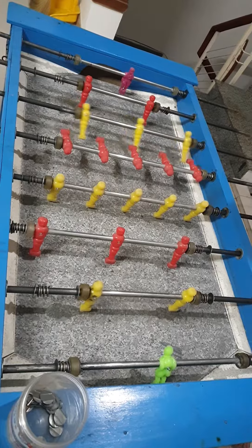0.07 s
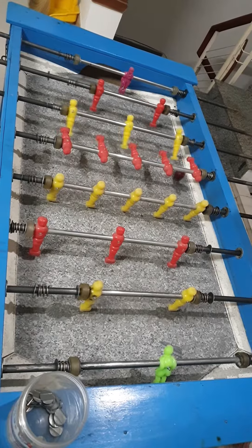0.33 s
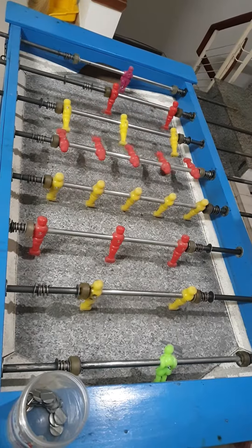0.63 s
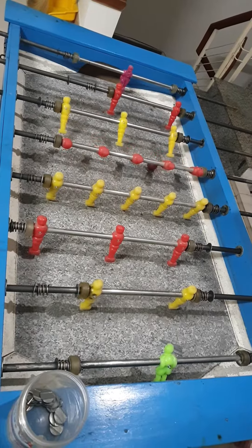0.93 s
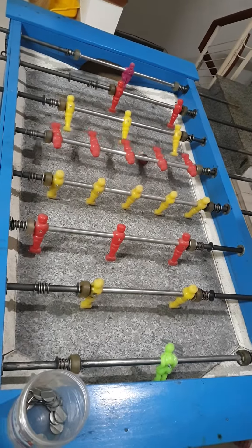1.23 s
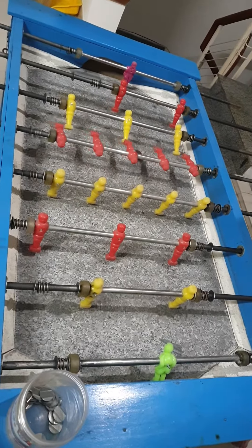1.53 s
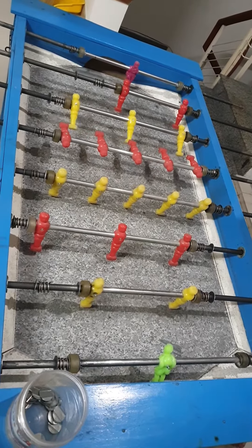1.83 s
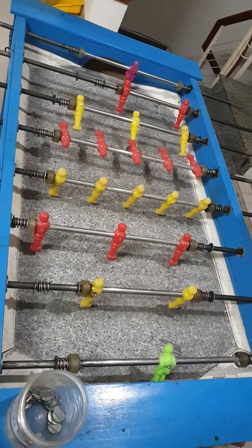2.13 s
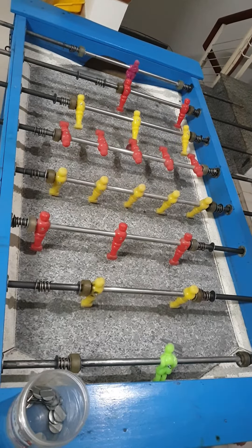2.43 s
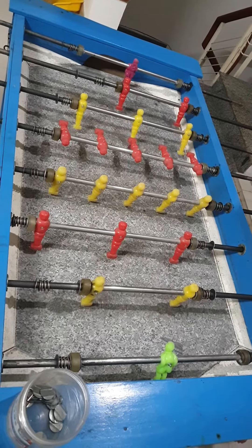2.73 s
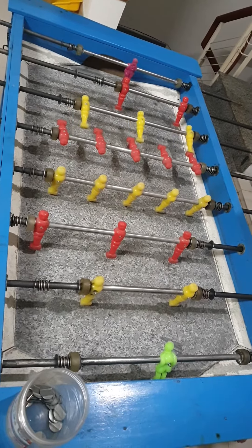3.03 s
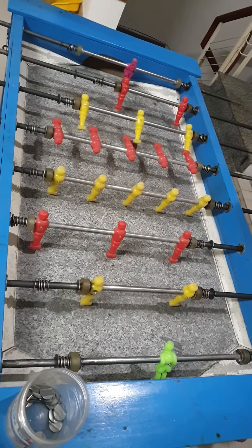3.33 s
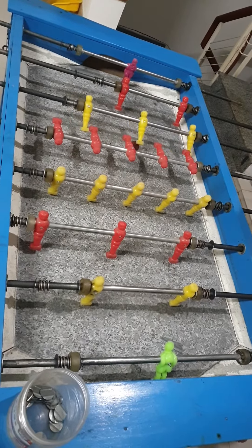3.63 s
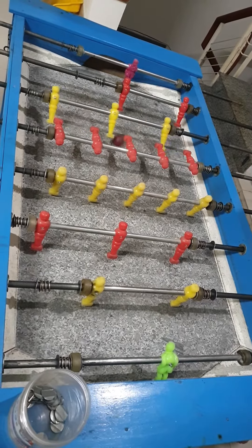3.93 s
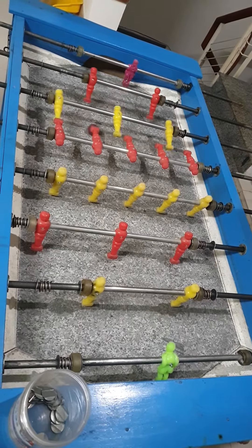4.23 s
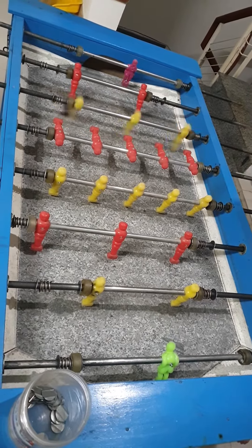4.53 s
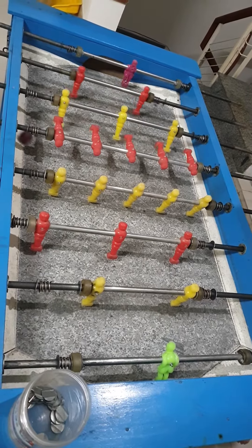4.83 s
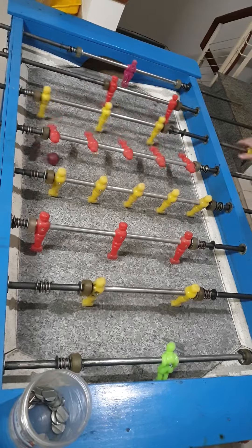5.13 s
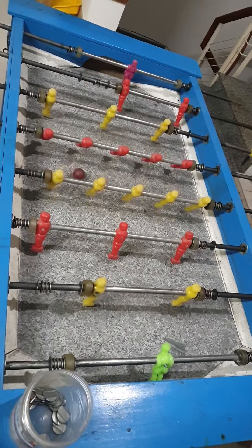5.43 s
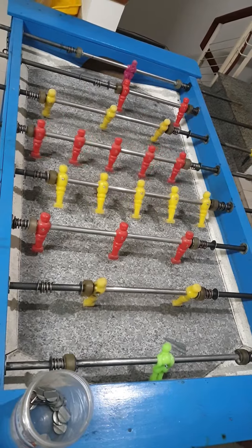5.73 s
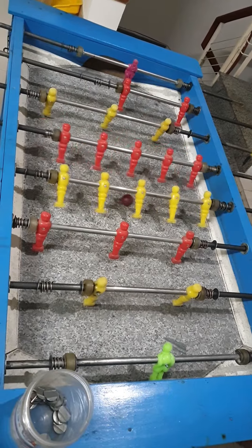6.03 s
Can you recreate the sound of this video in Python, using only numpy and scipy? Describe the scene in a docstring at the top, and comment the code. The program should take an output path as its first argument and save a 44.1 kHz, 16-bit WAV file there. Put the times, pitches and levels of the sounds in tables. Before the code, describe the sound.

Sharp clacks and metallic rattles burst from a table football game close by, then fall away to a few soft bumps. Halfway through, play picks up: the ball is knocked and rumbles over the playfield, and a hard volley of hits rings the wooden cabinet. Sliding steel rods and their springs clink and zing, ending with a muffled knock. The hits echo in a hall with a faint hum.

```python
"""Plastic men crack a ball against the wooden cabinet of a table football game in a hard, echoing hall.
Each blow makes the wood ring, and between blows the ball rolls over the playfield.
Steel rods scrape in their bushings (the sleeves that hold them), their washers clash and their
buffer springs ring. A faint hum lies underneath. It is all heard from one end of the table."""
import sys
import numpy as np
from scipy import signal
from scipy.fft import rfft, irfft, next_fast_len
from scipy.io import wavfile
from scipy.ndimage import map_coordinates

SR = 44100
rng = np.random.default_rng(int(sys.argv[2]) if len(sys.argv) > 2 else 0)


def master_out(mix):
    """Clip the mix to full scale and print it as 16-bit PCM to the path in sys.argv[1]."""
    frames = np.transpose(np.atleast_2d(mix))
    ceiling = np.clip(frames, -1, 1)
    pcm = np.round(ceiling * 32767).astype(np.int16)
    wavfile.write(sys.argv[1], SR, pcm)


N = 268569
T = np.arange(SR // 3) / SR  # time within one short sound [s]

# Blows of men, ball and rod ends on the cabinet. Treble above the hardness is dulled.
# (time [s], level [dB], hardness [Hz], bass thump [dB], main resonance [Hz])
BLOWS = [(-.07, -17, 5850, 7, 1220), (.1002, -7, 3610, 0, 993), (.129, -20.5, 5950, -5, 3000),
         (.247, -9.5, 5930, -2, 1300), (.2973, -14.5, 3570, -1.5, 1310), (1.232, -31.5, 854, 2, 460),
         (1.6335, -44.5, 797, 7, 683), (2.978, -45.5, 3500, 11.5, 1144), (3.4692, -25, 2040, -1.5, 1350),
         (3.6638, -25, 2000, -2, 715), (3.681, -28, 2240, -11, 1550), (3.747, -42.5, 1290, 15.5, 530),
         (3.8427, -27.5, 1760, -3.5, 1350), (4.258, -34, 1200, 3, 597), (4.6384, -14, 9500, -8.5, 3850),
         (4.6627, -7, 6250, -18, 2860), (4.6774, -13.5, 2290, -8, 1090), (4.8236, -12, 1810, -1.5, 568),
         (4.9604, -21, 2200, 1, 590), (4.983, -15, 2280, -8.5, 1110), (5.028, -20, 3120, -2.5, 1620),
         (5.9057, -14, 960, -16, 974), (5.917, -28, 900, 9, 650)]
# Ringing notes of cabinet, playfield and men. A fade time, or t60, is the time to drop by 60 dB.
# (pitch [Hz], level [dB], fade time [s])
BODY_NOTES = [(144.3, -14.5, 0.15), (179.5, -12.5, 0.16), (199.3, -16, 0.29), (296.8, -14, 0.12),
              (444.6, -17.5, 0.15), (559.6, -8.5, 0.05), (645, -14.5, 0.048), (790, -7, 0.042),
              (970, -12, 0.1), (1069, -11, 0.068), (1080, -19.5, 0.093), (1245, -10, 0.058),
              (1411.6, -4, 0.055), (1657, -8.5, 0.032), (1815, -8, 0.04), (1983, -3.5, 0.022),
              (2804, -27.5, 0.02), (3335, -13, 0.16), (3838, -5, 0.062), (4900, -21.5, 0.15)]
# Tone of a blow's crack and clatter: (frequency [Hz], level [dB])
CLACK_SPECTRUM = [(30, -28.5), (80, -19.5), (160, -10), (350, -4), (1150, 0), (2200, 1), (4200, -0.5),
                  (5600, -4), (7600, -6.5), (8800, -27.5), (16000, -27.5)]
# How long the cabinet clatters: (frequency [Hz], fade time [s])
CABINET_FADE = [(150, 0.16), (500, 0.42), (1500, 0.15), (5000, 0.085), (12000, 0.041)]
# Washers and springs clashing on the rods: (time [s], level [dB], treble tilt [dB per octave])
WASHER_CLASHES = [(-.03, -18.5, -2), (0.1023, -19, -1.5), (0.134, -18.5, 8), (.191, -26.5, .5),
                  (0.2474, -27.5, -11), (.638, -47, 7.5), (.856, -46.5, -7.5), (1.2, -47, -2),
                  (1.238, -44, 7.5), (2.964, -40, 0.5), (2.978, -30, 3), (3.6645, -11.5, 5),
                  (4.038, -38, 4.5), (4.246, -46, -0.5), (4.296, -43, 0), (4.62, -35, 0.5),
                  (4.6385, -13.5, 0), (4.6546, -20, -1.5), (5.069, -28.5, 1.5), (5.153, -32, -2),
                  (5.255, -37, 9), (5.299, -31, 2.5), (5.351, -37, -3), (5.781, -30.5, 19),
                  (5.832, -33.5, 1), (5.914, -39, 11)]
# Tone of the steel clashes and scrapes, including the microphone's dip near 9 kHz:
# (frequency [Hz], level [dB])
STEEL_SPECTRUM = [(30, -57), (300, -18), (1000, -0.5), (3000, -4), (5500, -2.5), (7800, 1), (8700, -10),
                  (10500, -4), (13000, -5), (15800, -6.5)]
# Spring coil notes that every clash rings: (pitch [Hz], level [dB], fade time [s])
COIL_NOTES = [(4940, -20, 0.12), (5480, -21.5, 0.1097), (7640, -21.5, .24), (11560, -25, .4),
              (12900, -24, 0.37)]
# Thin notes of jolted springs: (time [s], pitch [Hz], level [dB])
SPRING_ZINGS = [(0.093, 9400, -27), (2.968, 9370, -30.5), (4.037, 12500, -37), (4.135, 10300, -41),
                (4.209, 12500, -36), (4.293, 12900, -29), (4.707, 13080, -21), (5.141, 13230, -26.5),
                (5.288, 10300, -25), (5.302, 12700, -26), (5.347, 10150, -29), (5.505, 10800, -29.5),
                (5.777, 10940, -24.5), (5.835, 10850, -28.5)]
# Strokes of the sliding rods: (time [s], length [s], level [dB])
ROD_STROKES = [(-.05, 0.32, -42), (4.02, 0.27, -53), (5.06, 0.5, -48), (5.5, 0.24, -50),
               (5.76, 0.15, -40.5)]
# Runs of the ball after a kick: (time [s], length [s], level [dB])
BALL_RUNS = [(-.05, 0.033, -34), (1.23, 0.071, -50), (1.63, .08, -60.5), (2.24, 0.028, -62),
             (2.84, 0.92, -55), (3.7, 0.63, -41), (4.6, 0.15, -33.5), (5.42, 0.19, -44), (5.9, 0.23, -46.5)]
# Tone of the playfield drumming under the ball: (frequency [Hz], level [dB])
DRUM_SPECTRUM = [(30, -26), (50, -6), (75, -4), (100, -3.5), (138, 6), (190, -5), (250, -8.5), (400, -17),
                 (1000, -39), (4000, -91.5)]
# Tone of the ball's grinding: (frequency [Hz], level [dB])
GRIT_SPECTRUM = [(80, -25), (200, 3.5), (330, 1), (560, 5), (900, 0), (1400, -6.5), (2400, -16),
                 (5000, -35.5), (16000, -60.5)]
# Tone of the hall's still air: (frequency [Hz], level [dB])
AIR_SPECTRUM = [(15, -33.5), (25, -10.5), (53, -8), (120, -7), (149, -4.5), (354, -20.5), (607, -22),
                (659, -19), (714, -25), (1260, -38.5), (2350, -46), (2550, -25), (2840, -50), (4870, -43.5),
                (7800, -43), (9000, -55.5), (14000, -53.5)]
# Steady hum and whine: (pitch [Hz], level [dB])
HUM_TONES = [(48.4, -60), (667.5, -70.5), (2530, -77), (4797, -91.5)]
# How long the hall echoes: (frequency [Hz], fade time [s])
HALL_FADE = [(80, 1), (250, 1.41), (1000, 1.385), (2500, 1.23), (4200, 1.16), (7500, 0.89), (10000, 0.72),
             (15000, 0.6)]
# Left-right difference, relative to the sound both sides share: (frequency [Hz], level [dB])
STEREO_WIDTH = [(100, -63.5), (500, -62), (1000, -65.5), (2000, -48), (4500, -58), (6500, -48), (8300, -34),
                (9800, -7), (12000, -45.5)]


def knocks(echoes, ring_db=-2, clatter_db=-3, crack_db=2.5, crack_t60=0.026, sharpness=5.1,
           thump_hz=420, soft_hz=1620, detune=0.011):
    """Each blow cracks, rings the cabinet's main notes and sets its many lesser ones clattering."""
    out = np.zeros(N)
    hz, note_db, t60 = np.transpose(BODY_NOTES)[:, :, None]
    decay = amp(note_db - 60 * T / t60)
    for s, db, hard_hz, thump_db, main_hz in with_rebounds(BLOWS):
        # the spot that is hit sets the sign, strength and exact pitch of each note
        sign, strength_db, pitch = rng.standard_normal((3, len(BODY_NOTES), 1))
        waves = np.sin(2 * np.pi * hz * (1 + detune * pitch) * T)
        ring = (np.sign(sign) * amp(strength_db) * decay * waves).sum(0)
        clatter = fading(noise(CLACK_SPECTRUM, len(T)), CABINET_FADE)
        crack = noise(CLACK_SPECTRUM, len(T)) * amp(-60 * T / crack_t60)
        blow = amp(ring_db) * ring + amp(clatter_db) * clatter + amp(crack_db) * crack
        # a soft contact loses treble, a heavy one gains bass
        soft = lambda f: 1 / ((1 + 1j * f / hard_hz) * (1 + 1j * f / hard_hz - (f / hard_hz) ** 2))
        heavy = lambda f: 1 + (amp(thump_db) - 1) / (1 + 1j * f / thump_hz)
        # the struck part favours one band, which stands out more in a softer blow
        octaves_harder = np.log2(hard_hz / soft_hz)
        lift_db = 8.5 - 2 * octaves_harder
        band = lambda f: 1j * f / (sharpness * (main_hz - f * f / main_hz) + 1j * f)
        blow = filtered(blow, lambda f: soft(f) * heavy(f) * (1 + (amp(lift_db) - 1) * band(f)))
        hall_db = -4.5 + 2 * octaves_harder  # hard cracks fill the hall, soft bumps stay in the table
        add(out, s, in_hall(amp(db - lift_db / 2) * blow, echoes, hall_db))
    return out


def with_rebounds(blows, delay_s=.009, weaker_db=6, softening=0.71, heavier_db=4, playfield_hz=188):
    """Every blow lands twice: the second contact is weaker, duller and booms in the playfield."""
    for s, db, hard_hz, thump_db, main_hz in blows:
        yield s, db, hard_hz, thump_db, main_hz
        yield s + delay_s, db - weaker_db, hard_hz * softening, thump_db + heavier_db, playfield_hz


def clashes(echoes, chatter_db=5.0, rattle_db=-17, rattle_t60=.12, swell_s=0.0044, swell_at_db=-28.5):
    """Washers and coils close up in a quick swell of tiny contacts, then rattle and ring to rest."""
    out = np.zeros(N)
    for s, db, tilt_db in WASHER_CLASHES:
        progress = T / (swell_s * 2 ** ((swell_at_db - db) / 15))  # 15 dB louder swells twice as fast
        swell = progress * np.exp(1 - progress)
        rattle = amp(rattle_db - 60 * T / rattle_t60) * (1 - np.exp(-progress))
        contacts = amp(chatter_db * wobble(rate=700, size=len(T)))
        coils = sum(amp(note_db) * jingle(hz, t60, width_hz=220, attack_s=0.0062, count=8)
                    for hz, note_db, t60 in COIL_NOTES)
        chatter = unit(contacts * noise(STEEL_SPECTRUM, len(T), tilt_db))
        clash = (swell + rattle) * chatter + coils
        add(out, s, in_hall(amp(db) * clash, echoes, hall_db=-.5))
    return out


def zings(echoes):
    """A buffer spring that snaps free sings one thin note."""
    out = np.zeros(N)
    for s, hz, db in SPRING_ZINGS:
        add(out, s, in_hall(amp(db) * jingle(hz, t60=0.14), echoes, hall_db=-2))
    return out


def jingle(hz, t60, width_hz=95, attack_s=0.013, jangle_db=5, count=12):
    """A jolted spring rings with many close, high notes, chopped up by its coils touching."""
    spread, phase = rng.standard_normal((2, count, 1))
    fade = amp(-60 * T / t60) * (1 - np.exp(-T / attack_s))
    note = fade * np.sin(2 * np.pi * ((hz + width_hz * spread) * T + phase)).sum(0)
    note *= amp(jangle_db * wobble(rate=260, size=len(T)))
    return note * np.linalg.norm(fade) / np.linalg.norm(note)


def sliding_rods(echoes, catch_db=4, chirp_db=7, chirp_hz=12000, chirp_spread=.1, count=170):
    """Dry rods scrape and catch in their bushings while their loose springs chirp at random."""
    scrape = unit(noise(STEEL_SPECTRUM, N, tilt_db=-1.0) * amp(catch_db * wobble(rate=190)))
    chirps = np.zeros(N)
    for s, pitch in zip(rng.uniform(0, N / SR, count), rng.standard_normal(count)):
        hz = chirp_hz * np.exp(chirp_spread * pitch)
        add(chirps, s, amp(chirp_db) * jingle(hz, t60=.05, count=3))
    motion = pushes(ROD_STROKES, rise_s=0.018, fall_db_per_s=130.5)  # a hand starts and stops quickly
    return in_hall(motion * (scrape + chirps), echoes, hall_db=-5)[:N]


def rolling_ball(bump_db=3, equal_at_db=-29.5, grit_growth=1.224):
    """The ball drums evenly on the playfield and grinds over its grainy surface."""
    drum_gain = pushes(BALL_RUNS, rise_s=0.015, fall_db_per_s=29)  # it speeds up at once, then coasts
    # grinding grows faster with speed than drumming does
    grit_gain = amp(equal_at_db) * (drum_gain / amp(equal_at_db)) ** grit_growth
    bumps = amp(bump_db * wobble(rate=50))
    return drum_gain * noise(DRUM_SPECTRUM, N) + grit_gain * unit(bumps * noise(GRIT_SPECTRUM, N))


def hall_echoes(build_s=0.0038, count=12):
    """Several random versions of the hall's echo: each builds up, then dies treble first."""
    t = np.arange(SR + SR // 4) / SR
    tails = np.array([fading(rng.standard_normal(len(t)), HALL_FADE) for _ in range(count)])
    tails *= 1 - np.exp(-t / build_s)
    return tails / np.linalg.norm(tails, axis=1, keepdims=True)


def in_hall(x, echoes, hall_db):
    """A sound followed by one of the hall's echoes, picked at random."""
    response = amp(hall_db) * echoes[rng.integers(len(echoes))]
    response[0] = 1  # the direct sound
    return signal.fftconvolve(x, response)


def air_and_hum(air_db=-57, waver_radians=0.49):
    """Still air of the hall with a wavering hum and a thin whine."""
    t = np.arange(N) / SR
    hum = sum(amp(db) * unit(np.sin(2 * np.pi * hz * t + waver_radians * wobble(rate=12)))
              for hz, db in HUM_TONES)
    return amp(air_db) * noise(AIR_SPECTRUM, N) + hum


def amp(db):
    """Turn decibels into a gain to multiply by."""
    return 10 ** (np.asarray(db) / 20)


def unit(x):
    """Scale x to an average strength (rms) of 1."""
    return x / np.sqrt(np.mean(x ** 2) + 1e-20)


def along(points, hz):
    """Read a (frequency, value) table at hz, joining its points on a log frequency axis."""
    frequencies, values = np.transpose(points)
    return np.interp(np.log(hz + 1), np.log(frequencies + 1), values)


def wobble(rate, size=N):
    """A smooth curve through random values, rate of them a second."""
    return map_coordinates(rng.standard_normal(4096), [np.arange(size) * rate / SR], mode="wrap")


def filtered(x, response):
    """Multiply each frequency in x by response(frequency)."""
    size = x.shape[-1]
    padded = next_fast_len(size + SR // 8)
    return irfft(rfft(x, padded) * response(np.fft.rfftfreq(padded, 1 / SR)), padded)[..., :size]


def noise(spectrum, size, tilt_db=0):
    """Noise of strength 1 with the given tone, tilted by tilt_db for each octave above 3000 Hz."""
    octaves = lambda f: np.log2(np.maximum(f, 3000) / 3000)
    tone = lambda f: amp(along(spectrum, f) + tilt_db * octaves(f))
    return unit(filtered(rng.standard_normal(size), tone))


def fading(x, fade_times):
    """Let each frequency of x die away at its own speed."""
    hz, t, bands = signal.stft(x, SR, nperseg=256)
    fade = amp(-60 * t / along(fade_times, hz)[:, None])
    return signal.istft(bands * fade, SR, nperseg=256)[1][:len(x)]


def pushes(rows, rise_s, fall_db_per_s):
    """Gain of a series of pushes: each rises, holds until its length is up, then dies away."""
    t = np.arange(N) / SR
    gains = [np.clip((t - s) / rise_s, 0, 1) * amp(db - fall_db_per_s * np.maximum(t - s - length, 0))
             for s, length, db in rows]
    return np.max(gains, axis=0)


def add(track, s, x):
    """Mix x into the track, starting at s seconds."""
    start = round(s * SR)
    x = x[max(-start, 0):N - start]
    track[max(start, 0):][:len(x)] += x


def scene():
    """The table lies straight ahead; left and right differ only a little, in the treble."""
    echoes = hall_echoes()
    mid = knocks(echoes) + clashes(echoes) + zings(echoes) + sliding_rods(echoes)
    mid = mid + rolling_ball() + air_and_hum()
    side = filtered(mid, lambda hz: amp(along(STEREO_WIDTH, hz)) * np.exp(1j))  # phase turned 1 radian
    return np.array([mid + side, mid - side])


def record(dry, low_cut_hz=44, top_hz=15950):
    """The microphone drops the deepest bass and highest treble, and flattens the hardest cracks."""
    x = signal.sosfilt(signal.butter(4, low_cut_hz, "high", fs=SR, output="sos"), dry)
    flattened = x / (1 + np.abs(x) ** 6) ** (1 / 6)
    return filtered(flattened, lambda hz: 1 / (1 + (hz / top_hz) ** 200))


dry = scene()
out = record(dry)
master_out(out)
```